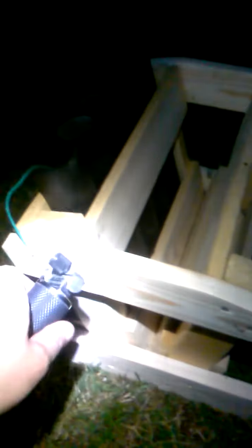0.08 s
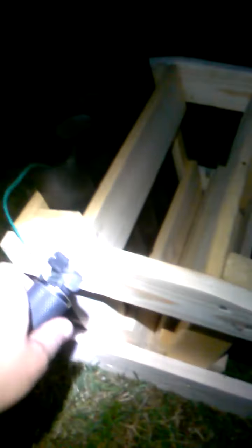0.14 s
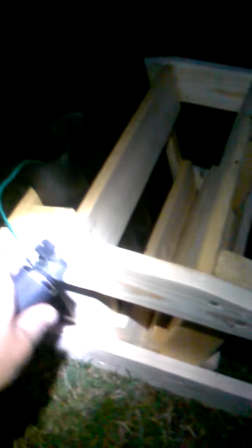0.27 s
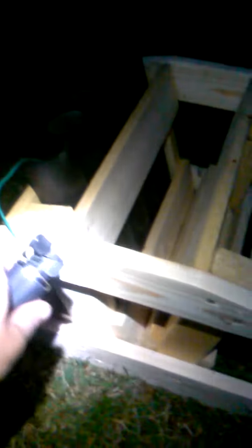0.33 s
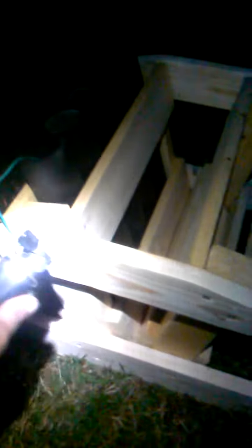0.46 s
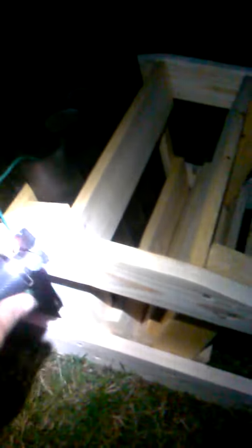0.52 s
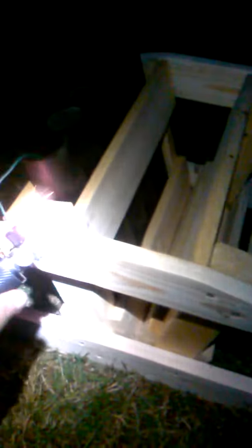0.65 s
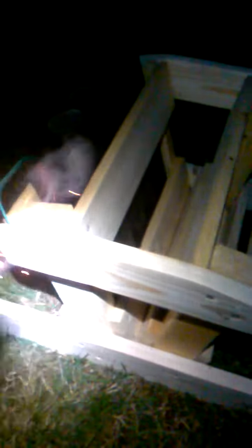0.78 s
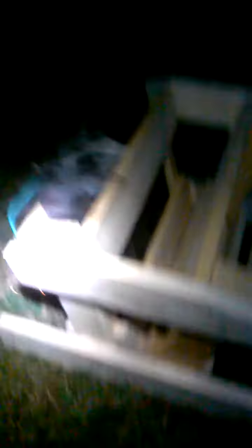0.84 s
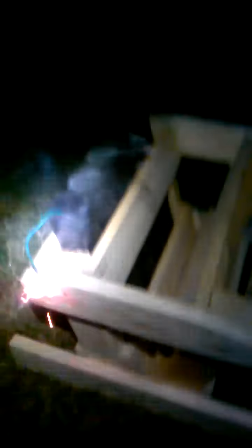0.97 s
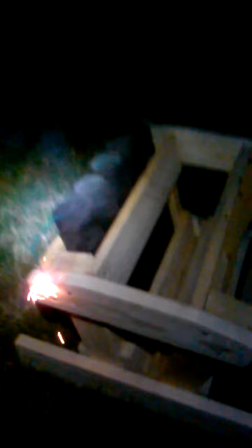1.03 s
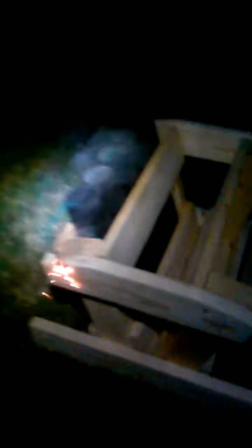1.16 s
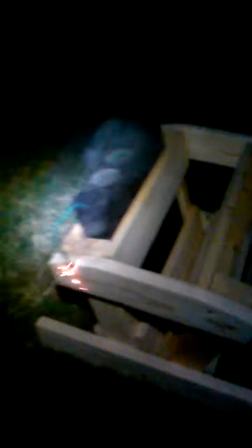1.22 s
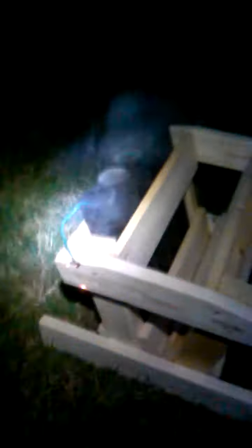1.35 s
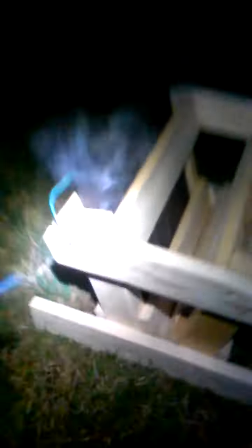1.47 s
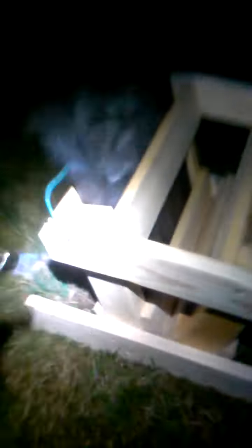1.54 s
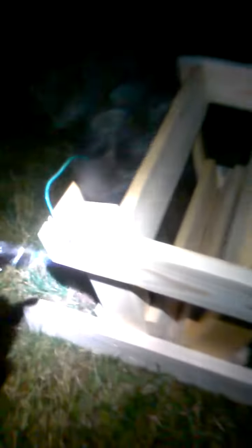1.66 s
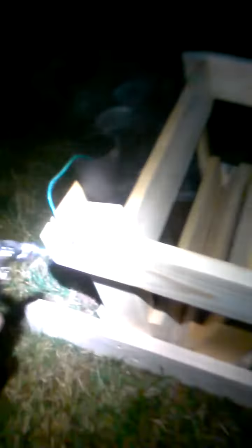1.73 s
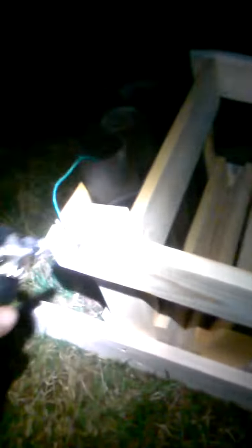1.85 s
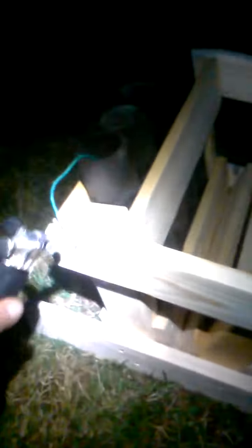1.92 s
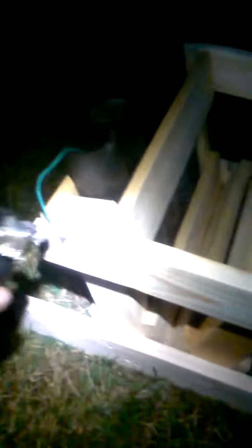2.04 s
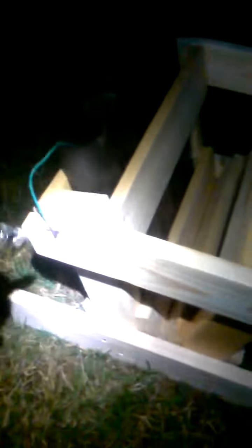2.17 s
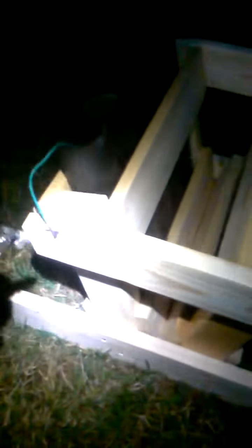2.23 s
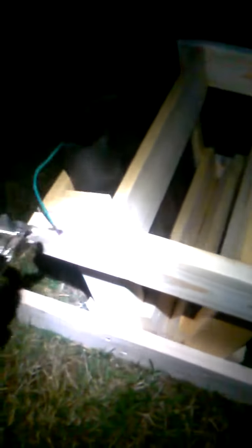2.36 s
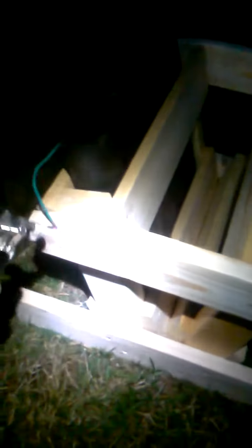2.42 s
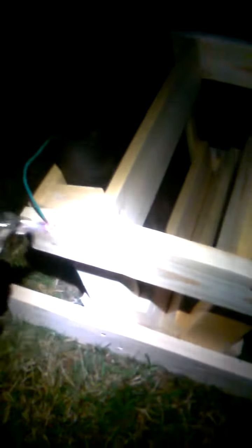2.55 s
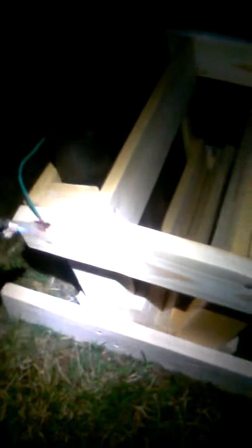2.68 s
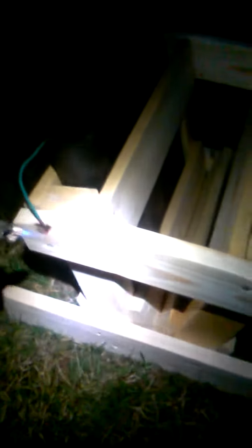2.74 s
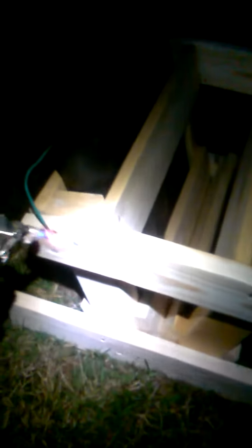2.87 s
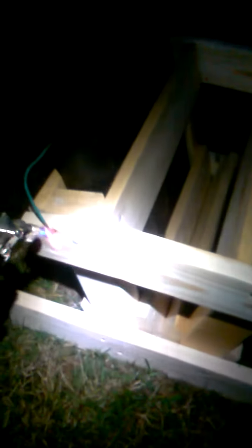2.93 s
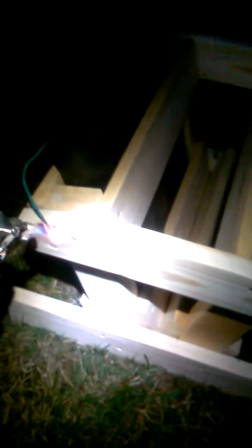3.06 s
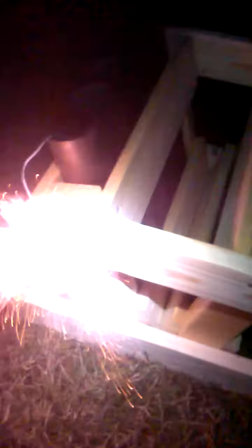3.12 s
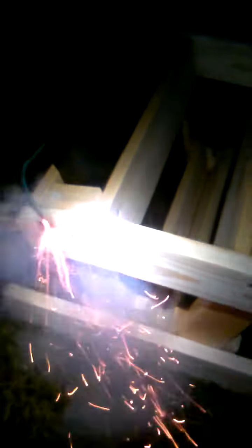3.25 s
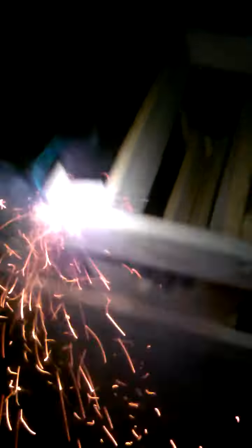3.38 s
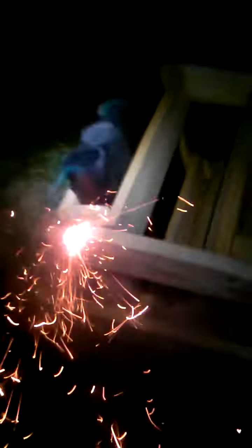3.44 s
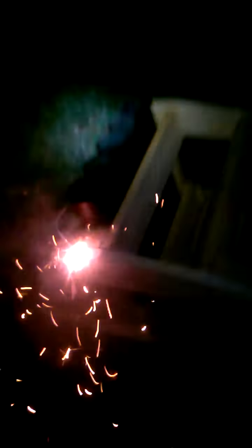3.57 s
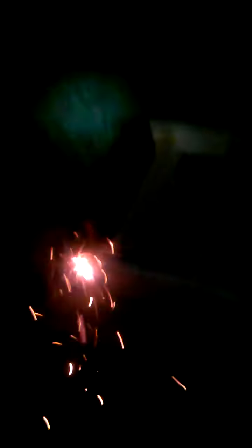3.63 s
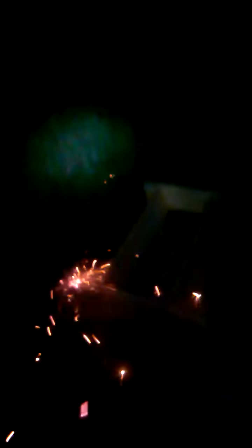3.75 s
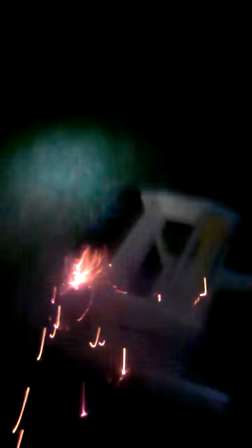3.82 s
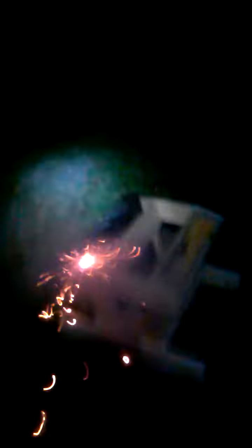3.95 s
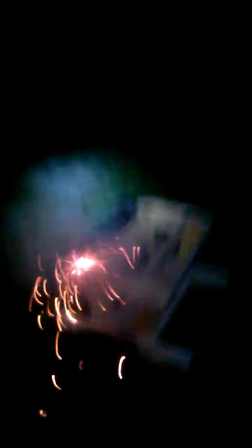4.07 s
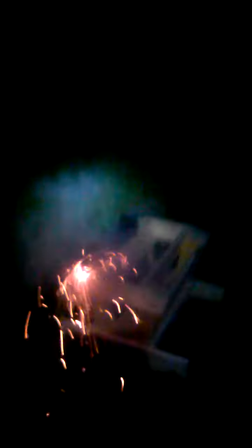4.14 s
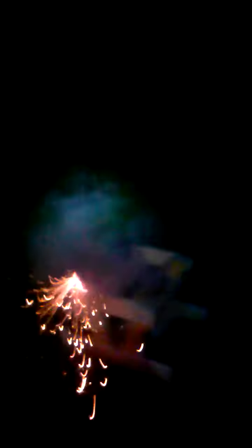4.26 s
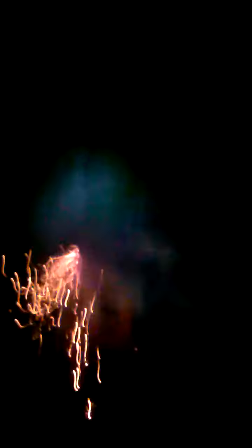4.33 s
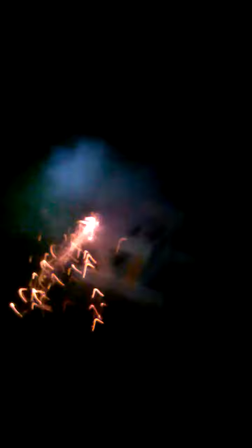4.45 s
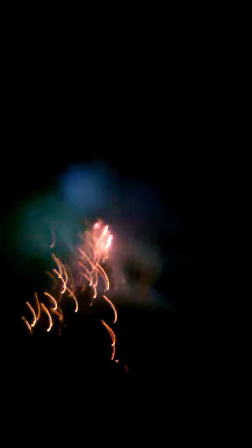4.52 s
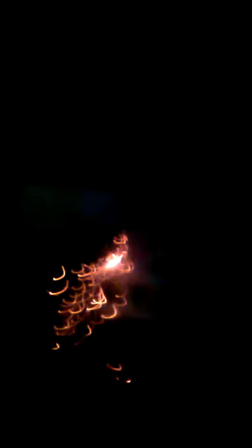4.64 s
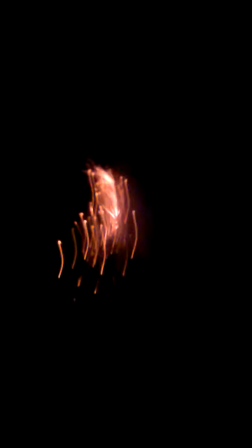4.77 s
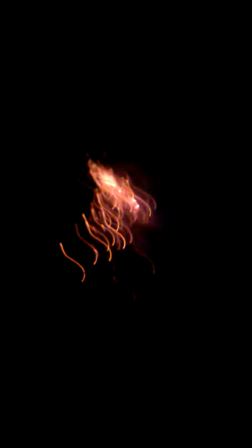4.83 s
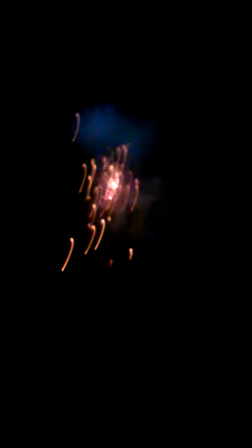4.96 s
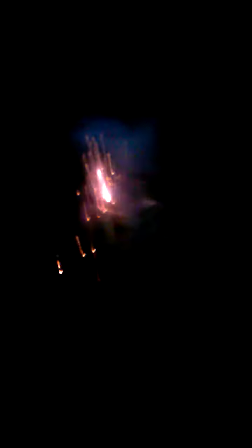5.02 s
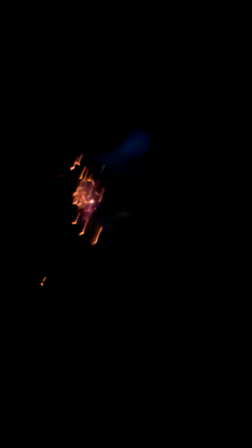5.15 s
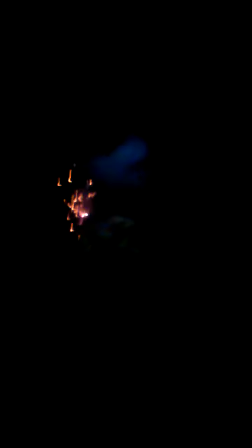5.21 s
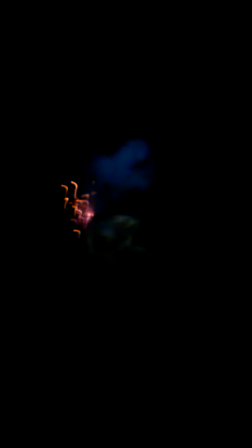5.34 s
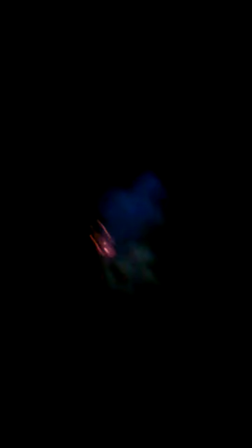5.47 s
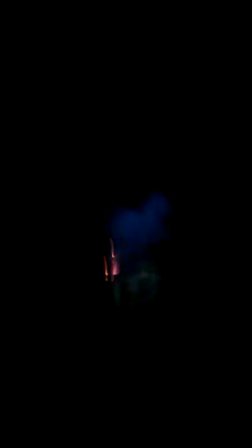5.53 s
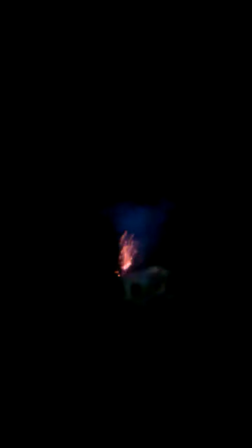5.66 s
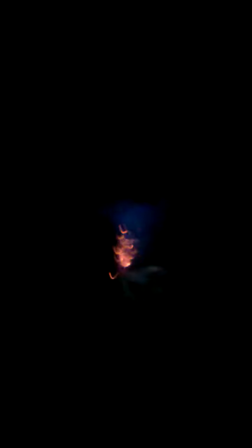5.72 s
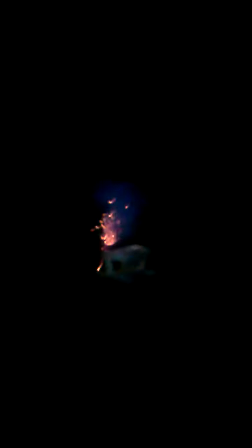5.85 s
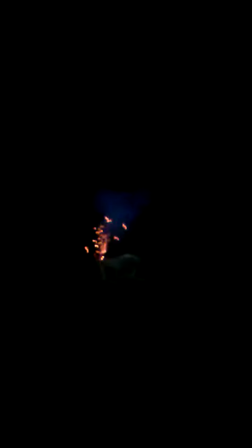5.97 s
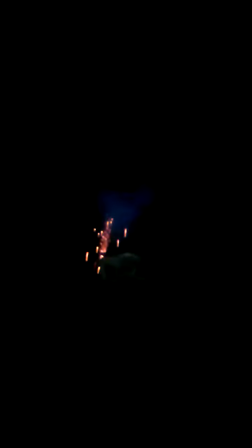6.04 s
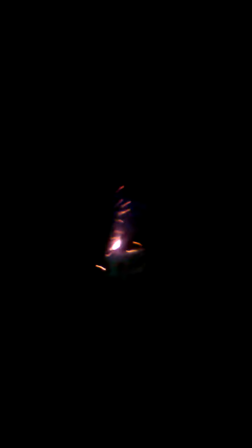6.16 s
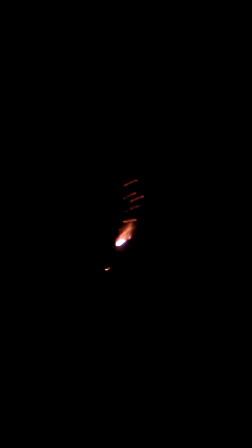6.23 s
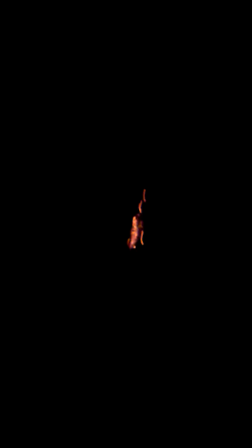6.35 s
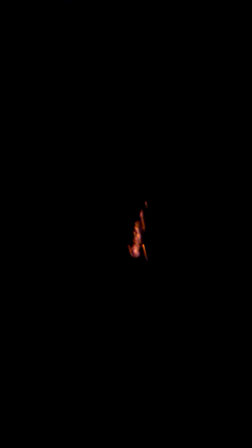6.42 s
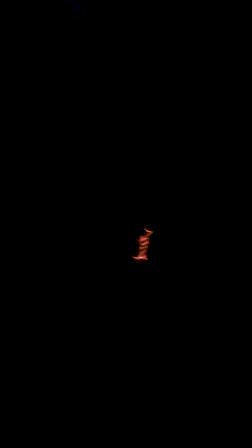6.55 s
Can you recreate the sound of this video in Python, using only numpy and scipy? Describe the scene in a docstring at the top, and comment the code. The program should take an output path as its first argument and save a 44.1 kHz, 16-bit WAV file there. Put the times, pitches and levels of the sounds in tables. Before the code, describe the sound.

A jet lighter hisses, a firework fuse spits briefly, then flares with a fierce whoosh and crackles away as someone retreats over grass at night.

```python
"""A firework fuse, outdoors at night, spits, flares up and burns: filtered noise and random grains in surges.
The jet lighter that lights it is noise through nozzle resonances; sparks snap as damped rings and cracks.
The listener backs away over grass: the fire turns hollow and fades, air buffets the microphone as low noise,
puffs and steps thud as short low pulses, dull knocks are noise bursts, small metal clinks as decaying modes."""
import sys
import numpy as np
from scipy import signal
from scipy.fft import rfft, irfft
from scipy.io import wavfile
from scipy.ndimage import uniform_filter1d, map_coordinates

SR = 44100
rng = np.random.default_rng(int(sys.argv[2]) if len(sys.argv) > 2 else 0)


def to_wav(s):
    """Save 16-bit WAV."""
    ch = np.atleast_2d(s).T  # columns
    pcm = np.round(np.clip(ch, -1, 1) * 32767)  # PCM
    wavfile.write(sys.argv[1], SR, pcm.astype(np.int16))


N = 290751
TIME = np.arange(N) / SR
FREQS = np.fft.rfftfreq(N, 1 / SR)
# Stages of the fuse, of the walk and of the stray sparks: start and end in seconds.
SPIT_S, FLARE_S, BURN_S = (.82, 1.87), (3.17, 3.69), (3.69, 6.6)
WALK_S, STRAY_S = (3.25, 6.25), (4.65, 6.59)


def amp(db):
    """Decibels to gain."""
    return 10 ** (np.asarray(db) / 20)


def unit(x):
    """Scales to rms 1."""
    return x / np.sqrt(np.mean(x ** 2) + 1e-20)


def decay(t, t60_s):
    """Exponential decay by 60 dB in t60_s."""
    return np.exp(-np.log(1000) * t / t60_s)


def colour(points):
    """Gain of a spectrum drawn in dB on a log-frequency axis."""
    hz, db = np.transpose(points)
    return amp(np.interp(np.log(FREQS + 1), np.log(hz + 1), db))


def curves(rows):
    """Each column of a table as a curve in time."""
    s, *columns = np.transpose(rows)
    return [np.interp(TIME, s, column) for column in columns]


def within(span_s, fade_s):
    """One from the start to the end of a span, fading to zero outside it."""
    ramp = np.minimum(TIME - span_s[0], span_s[1] - TIME) / fade_s + 1
    return np.clip(ramp, 0, 1) ** 2


def during(rows, fade_s):
    """One over the span of a table, fading to zero outside it."""
    return within((rows[0][0], rows[-1][0]), fade_s)


def shaped(x, gain):
    """Filters by a gain per frequency."""
    return irfft(rfft(x) * gain, N)


def halves(x, split_hz, low_band_hz, high_band_hz):
    """Splits a sound in two parts, each scaled to rms 1 within its own band."""
    share = 1 / (1 + (FREQS / split_hz) ** 8)
    parts = []
    for gain, (lo, hi) in ((share, low_band_hz), (1 - share, high_band_hz)):
        part = shaped(x, gain)
        in_band = shaped(x, (FREQS > lo) & (FREQS < hi))
        parts.append(part / np.std(in_band))
    return parts


def waver(corner_hz):
    """Random motion of rms 1, low-passed with a Gaussian."""
    return unit(shaped(rng.standard_normal(N), np.exp(-(FREQS / corner_hz) ** 2)))


def add(mix, s, sound):
    """Mixes a sound in at a time."""
    part = mix[round(s * SR):][:len(sound)]
    part += sound[:len(part)]


def gusts(rows, attack_s, fall_db_per_s, span_s=(0, np.inf)):
    """Gusts starting within a span rise, hold and die away; gives the gain of their low and high part."""
    power = np.zeros((2, N))
    t = np.arange(SR) / SR
    for s, length_s, *levels_db in rows:
        if span_s[0] <= s < span_s[1]:
            shape = np.minimum(t / attack_s, 1) * amp(-fall_db_per_s * np.maximum(t - length_s, 0))
            for part, db in zip(power, levels_db):
                add(part, s, (amp(db) * shape) ** 2)
    return np.sqrt(power)


def resonate(x, hz, width_hz):
    """Two passes of a resonance that follows the curve hz; width_hz is that of one pass."""
    turn = np.exp(2j * np.pi * np.cumsum(hz) / SR)
    r = np.exp(-np.pi * width_hz / SR)
    for _ in range(2):
        x = turn * signal.lfilter([1 - r], [1, -r], x / turn)
    return unit(x.real)


def airy_tone(rows, width_hz):
    """Noise sounds one narrow resonance that slides in pitch."""
    hz, db = curves(rows)
    return during(rows, fade_s=0.046) * amp(db) * resonate(rng.standard_normal(N), hz, width_hz)


# Still air. Each point: frequency in Hz, relative gain in dB.
NIGHT_COLOUR = [(12, -35), (20, 3.5), (48, 4), (107, 0), (258, -7.5), (400, -7.5), (520, -13.5),
                (880, -120)]


def night_air(level_db=-51.5):
    """Still night air: steady low noise."""
    return amp(level_db) * unit(shaped(rng.standard_normal(N), colour(NIGHT_COLOUR)))


# Lighter jet, one list per try. Each row: time in seconds, roar and nozzle whistle in relative dB.
JET_LEVELS = [
    [(0, -43, -51.5), (.3, -41, -54.5), (.6, -42.5, -53), (.84, -44, -53.5)],
    [(1.6, -47.5, -49), (1.8, -40, -50), (1.87, -45.5, -52), (1.93, -38.5, -47), (2.3, -37.5, -46.5),
     (2.56, -36.5, -47), (2.9, -38.5, -46.5), (3.16, -36.5, -47)],
]
# Jet resonances per try. Each row: frequency in Hz, nominal width in Hz, relative level in dB.
FIRST_TRY_MODES = [(200, 390, -29), (620, 265, -1), (1275, 540, -10), (1960, 190, -13.5), (3160, 700, -11),
                   (5050, 540, -11), (7630, 2100, -11.5), (10030, 1700, -8.5), (12750, 1200, -8.5),
                   (15500, 2500, -23)]
SECOND_TRY_MODES = [(200, 500, -30), (539, 250, 9), (1190, 440, -7.5), (1920, 240, -21), (3165, 350, -11.5),
                    (5200, 980, -22), (7710, 930, -8.5), (10360, 1200, -16.5), (13060, 1300, -13)]
# Jet cancels against its echo from the wood. Each row: centre in Hz, 1/e half-width in Hz, gain in dB.
JET_DIPS = [(2500, 230, -5), (3700, 310, -8.5)]


def jet(rows, modes, fade_s, roar_db, whistle_db, skirt):
    """Turbulent gas sounds the resonances of the lighter's nozzle."""
    power, dips_db = 0, 0
    for hz, width_hz, db in modes:
        power = power + amp(db) ** 2 / (1 + ((FREQS - hz) / (0.43 * width_hz)) ** 2) ** skirt
    for hz, width_hz, db in JET_DIPS:
        dips_db = dips_db + db * np.exp(-((FREQS - hz) / width_hz) ** 2)
    gas = shaped(rng.standard_normal(N), np.sqrt(power) * amp(dips_db))
    roar, whistle = halves(gas, 2500, (300, 900), (6500, 15000))
    low_db, high_db = curves(rows)
    sound = amp(low_db + roar_db) * roar + amp(high_db + whistle_db) * whistle
    return during(rows, fade_s) * sound


def powder(grains_per_s, spread_db, grain_db, sputter_db):
    """Burning powder: a sputtering rush of gas with countless tiny bursts of uneven size."""
    sizes = amp(spread_db * np.minimum(rng.exponential(1, N), 4)) * rng.choice([-1, 1], N)
    bursts = sizes * (rng.random(N) < grains_per_s / SR)
    gas = rng.standard_normal(N)
    return (gas + amp(grain_db) * unit(bursts)) * amp(sputter_db * waver(corner_hz=140))


def reflections(x, strength, nearest_s, farthest_s, drift, count=6):
    """Echoes from the boards and the ground comb the hiss; the combs slide as their delays sway."""
    out = x.copy()
    for k, lag_s in enumerate(np.geomspace(nearest_s, farthest_s, count)):
        sway = np.sin(2 * np.pi * (rng.uniform(.2, .6) * TIME + rng.random()))
        position = (TIME - lag_s * (1 + drift * sway)) * SR
        out += (-1) ** k * strength * map_coordinates(x, [position], order=3)
    return out


def flicker(x, patchy_db, size=256):
    """The flame's colour shifts from moment to moment, in patches some hundreds of hertz wide."""
    overlap = size * 3 // 4
    z = signal.stft(x, nperseg=size, noverlap=overlap)[2]
    patches = uniform_filter1d(rng.standard_normal(z.shape), size=5, axis=0)
    patches = uniform_filter1d(patches, size=22, axis=1)
    return signal.istft(z * amp(patchy_db * unit(patches)), nperseg=size, noverlap=overlap)[1][:N]


# Surges of burning powder. Each row: start in seconds, hold in seconds, rush and fizz in relative dB.
SURGES = [(.85, 0.13, -64, -42), (.905, 0.16, -38.5, -47), (.995, 0.013, -35.5, -56),
          (1.185, 0.11, -34.5, -39.5), (1.36, 0.067, -39, -40), (1.45, .06, -46, -49.5),
          (1.66, 0.033, -44, -55), (3.18, 0.03, -17.5, -16), (3.227, 0.072, -24, -18.5),
          (3.348, 0.034, -26, -16), (3.38, 0.018, -24, -13.5), (3.424, 0.011, -25.5, -16.5),
          (3.455, 0.0098, -26.5, -21.5), (3.49, 0.036, -29, -21.5), (3.542, 0.013, -26.5, -22.5),
          (3.641, 0.008, -28, -20), (3.705, 0.098, -34, -27), (3.935, 0.026, -41, -31),
          (4.025, 0.011, -49, -35), (4.09, 0.021, -35.5, -31.5), (4.165, 0.079, -40, -31),
          (4.31, 0.044, -50, -30.5), (4.39, .11, -38.5, -29), (4.705, 0.094, -39, -28.5),
          (4.925, 0.054, -37.5, -26.5), (5.025, 0.018, -53, -28), (5.303, 0.042, -37.5, -35.5),
          (5.452, 0.047, -46, -38), (5.533, 0.01, -41.5, -31), (5.622, 0.11, -41.5, -29.5),
          (5.818, 0.023, -51, -38), (5.9, 0.043, -46, -31), (6.188, 0.021, -39, -28.5),
          (6.28, 0.02, -50, -38), (6.39, .02, -64, -42), (6.463, .125, -44, -33)]


def spit_strength(rush_db=-48, fizz_db=-52):
    """Rush and fizz gain of the spit: soft surges over a smoulder."""
    low, high = gusts(SURGES, attack_s=0.013, fall_db_per_s=129, span_s=SPIT_S)
    smoulder = within(SPIT_S, fade_s=0.089)
    return np.hypot(low, amp(rush_db) * smoulder), np.hypot(high, amp(fizz_db) * smoulder)


# Each point: frequency in Hz, relative gain in dB.
SPIT_COLOUR = [(59, -26.5), (100, -13), (153, -9), (233, -12.5), (265, -17), (342, -4.5), (593, -9),
               (748, -5.5), (1600, -4), (2200, -7.5), (3370, -15), (4530, -8), (8370, -5), (9910, -5.5),
               (15800, -19)]


def spit(rush_db=-2.0):
    """The tip of the fuse catches for a moment and dies."""
    fire = powder(grains_per_s=1200, spread_db=4.5, grain_db=-4.0, sputter_db=1.0)
    fire = shaped(fire, colour(SPIT_COLOUR))
    fire = reflections(fire, strength=0.11, nearest_s=0.00185, farthest_s=.007, drift=0.111)
    rush, fizz = halves(fire, 3000, (900, 2600), (4000, 15000))
    low, high = spit_strength()
    return amp(rush_db) * low * rush + high * fizz


# Hollow puff of the spit. Each row: time in seconds, pitch in Hz, level in dB.
PUFF = [(.82, 560, -46), (.92, 536, -37), (1.0, 554, -35.5), (1.08, 474, -51), (1.14, 450, -39.5),
        (1.3, 490, -45), (1.47, 477, -42.5), (1.6, 490, -50)]


def puff():
    """The spit's gas sounds a hollow, sliding resonance."""
    return airy_tone(PUFF, width_hz=163)


# Snaps, loud and faint, of sparks or things knocking in the hand.
# Each row: start in seconds, relative level in dB, pitch in Hz, noisiness from 0 to 1.
SNAPS = [(1.054, -26, 11800, 0), (1.148, -7.5, 7300, 0.92), (1.152, -8.5, 9100, 0.5),
         (1.1555, -6, 5880, .9), (1.185, -15, 8900, .7), (1.2079, -18.5, 6850, 0.56),
         (1.319, -21.5, 8200, 0.93), (1.371, -11.5, 7840, 0.34), (1.3774, -13, 7700, 0.1),
         (1.3883, -15.5, 7700, 0.3), (1.392, -13.5, 8600, 0.05), (1.832, -19.5, 7000, 0.1),
         (3.437, -13, 6700, .8), (4.4621, -9, 7460, 0.7), (4.4654, -7, 11400, 0.65), (4.477, -6, 9200, 0.1),
         (4.4812, -7, 8600, .85), (4.713, -13, 10500, 0.6), (4.744, -4, 11800, 0.3), (4.757, -4, 6100, 0.7),
         (4.7668, 0, 6100, 0.7), (4.777, -0.5, 7040, 0.6), (4.7826, 4, 6050, 0.86), (4.89, -13, 5900, .3),
         (4.898, -8, 6400, .9), (4.946, -17, 5600, 0.6), (4.958, -6, 6940, 0.75),
         (4.9682, -4.5, 9100, 0.97), (4.976, -6, 7800, 0.5), (5.315, -13.5, 6760, 0.04),
         (5.3382, -6.5, 6570, 0.47), (5.3404, -11.5, 4860, 0.36), (5.45, -19, 5860, 0.1),
         (5.5374, -22, 7800, 0.5), (5.6403, -5, 6000, 0.77), (5.662, -12, 6100, 0.2),
         (5.6995, -3, 7600, 0.5), (5.7028, -3, 8800, 1), (5.7407, -5.5, 6260, 1),
         (5.9115, -16.5, 5100, 0.6), (5.9438, -20, 6000, .6), (6.0467, -11.5, 7330, 0),
         (6.192, -21, 7200, 0.05), (6.207, -12.5, 7200, 0.5), (6.2491, -15, 10800, .6),
         (6.4684, -15.5, 11700, 0.5), (6.519, -12, 10000, .95), (6.5287, -4.5, 7600, 0.34),
         (6.561, -10, 6500, .7), (6.5676, -5, 6600, 0.34)]
SCATTER_MEAN_GAP_S, SCATTER_DROP_DB = .0055, 12.5
STRAY_PER_S, STRAY_OVER_FIZZ_DB, STRAY_SPREAD_DB = 22, 13.5, 1
STRAY_HZ, DETUNE_OCTAVES, STRAY_NOISINESS = 6530, 0.22, 0.35


def sparks(scatter_count=2, slots=200):
    """Typed snaps, the weaker ones they scatter, and strays at jittered times that follow the fizz level."""
    rows = list(SNAPS)
    for (s, db, hz, noisy), draws in zip(SNAPS, rng.random((len(SNAPS), scatter_count, 2))):
        for gap, tune in draws:
            s += SCATTER_MEAN_GAP_S * (.5 + gap)
            db -= SCATTER_DROP_DB
            rows.append((s, db, hz * 2 ** (DETUNE_OCTAVES * (2 * tune - 1)), noisy))
    fizz = burn_strength()[1]
    times = STRAY_S[0] + (np.arange(slots) + rng.random(slots)) / STRAY_PER_S
    for s, (loud, tune) in zip(times[times < STRAY_S[1]], rng.standard_normal((slots, 2))):
        fizz_db = 20 * np.log10(np.interp(s, TIME, fizz) + 1e-9)
        db = fizz_db + STRAY_OVER_FIZZ_DB + STRAY_SPREAD_DB * loud
        rows.append((s, db, STRAY_HZ * 2 ** (DETUNE_OCTAVES * tune), STRAY_NOISINESS))
    return rows


# Each point: frequency in Hz, relative gain in dB.
SNAP_COLOUR = [(1000, -19.5), (2500, -5), (3800, -5.5), (5000, 5.5), (8000, 0), (11000, 0), (15800, -8)]


def snaps(level_db=3, ring_t60_s=0.0073, rise_s=0.00027, tail_db=-19, tail_t60_s=0.057, overtone=0.51, echo=0.15):
    """Each snap is a brief damped ring and a noisy crack, with a noise tail and a ground echo."""
    out, t = np.zeros(N), np.arange(2048) / SR
    for s, db, hz, noisy in sparks():
        crack, scatter = rng.standard_normal((2, len(t)))
        upper_hz = hz * rng.uniform(1.026, 1.36)
        tone = unit(np.sin(2 * np.pi * hz * t) - overtone * np.sin(2 * np.pi * upper_hz * t))
        hit = (np.sqrt(1 - noisy) * tone + np.sqrt(noisy) * crack) * decay(t, ring_t60_s)
        hit += amp(tail_db) * scatter * decay(t, tail_t60_s)
        hit *= amp(db + level_db) * (1 - np.exp(-t / rise_s))
        add(out, s, hit)
        add(out, s + rng.uniform(0.003731, 0.004018), echo * hit)
    return shaped(out, colour(SNAP_COLOUR))


# Low soft thuds: puffs of the spitting fuse, then steps on grass.
# Each row: start in seconds, level in dB, pitch in Hz.
THUDS = [(1.056, -33, 70), (1.264, -45, 92), (1.716, -39, 51), (4.811, -19, 101), (5.125, -16, 50),
         (5.157, -15, 74), (5.616, -15.5, 59), (5.639, -11, 118), (6.062, -8, 70.5)]


def thuds(cycles=0.4):
    """A thud is a soft push, strongest after a fraction of a cycle, that dies within a cycle or two."""
    out, t = np.zeros(N), np.arange(SR // 5) / SR
    for s, db, hz in THUDS:
        u = t * hz / cycles
        add(out, s, amp(db) * u * np.exp(1 - u) * np.sin(2 * np.pi * hz * t))
    return out


# Jet whistles briefly as it is aimed anew. Each row: time in seconds, pitch in Hz, level in dB.
WHISTLE = [(2.58, 2720, -63), (2.66, 2770, -54), (2.78, 2870, -61), (2.92, 3000, -63)]


def aiming_whistle():
    """The jet's gas sounds a narrow, rising resonance."""
    return airy_tone(WHISTLE, width_hz=160)


# Swings of the microphone. Each row: start in seconds, hold in seconds, depth and flutter in relative dB.
BUFFET = [(3.18, 0.084, -42, -24.5), (3.36, .11, -44, -34), (3.925, 0.031, -25.5, -36),
          (4.015, 0.048, -28.5, -52), (4.295, 0.12, -24, -33.5), (4.51, .12, -30, -44),
          (5.02, 0.028, -24, -38), (5.115, 0.11, -15.5, -23), (5.36, 0.035, -22, -58),
          (5.45, 0.11, -35, -43), (5.6, 0.048, -20, -29.5), (5.68, 0.13, -30.5, -39.5),
          (5.805, 0.11, -18, -31.5), (5.96, 0.17, -22, -32.5), (6.12, 0.14, -27, -67),
          (6.38, 0.055, -30.5, -56), (6.54, 0.056, -30.5, -48.5)]
# Each point: frequency in Hz, relative gain in dB.
BUFFET_COLOUR = [(8.8, -16), (15, 11), (35, 3.5), (122, -7.5), (176, -14.5), (233, -17.5), (282, -29),
                 (317, -26), (500, -41), (650, -64), (1100, -120)]


def buffet(flutter_db=-1, draught_depth_db=-40, draught_flutter_db=-44):
    """Air tumbles over the moving microphone: a light draught, and a gust with each swing."""
    air = shaped(rng.standard_normal(N), colour(BUFFET_COLOUR))
    depth, flutter = halves(air, 90, (20, 90), (90, 250))
    low, high = gusts(BUFFET, attack_s=0.029, fall_db_per_s=220)
    moving = within(WALK_S, fade_s=0.15)
    low = np.hypot(low, amp(draught_depth_db) * moving)
    high = np.hypot(high, amp(draught_flutter_db) * moving)
    return low * depth + amp(flutter_db) * high * flutter


# Each point: frequency in Hz, relative gain in dB.
FLARE_COLOUR = [(40, 6), (120, -1.5), (300, -8.5), (630, 1), (900, -4), (1250, 1), (2200, -2), (3400, -11),
                (4950, 2.5), (6600, -9), (7700, 3), (10800, -16.5), (13000, -8.5), (15800, -20)]


def flare(fizz_db=-1.0, roar_db=-28, hiss_db=-23, fade_db_per_s=30):
    """The fuse takes fire: a few fierce gusts over a dying roar."""
    fire = powder(grains_per_s=2900, spread_db=1.5, grain_db=-11.0, sputter_db=2.0)
    fire = shaped(fire, colour(FLARE_COLOUR))
    rush, fizz = halves(fire, 3200, (300, 2600), (4000, 15000))
    low, high = gusts(SURGES, attack_s=0.012, fall_db_per_s=333, span_s=FLARE_S)
    age_s = np.maximum(TIME - FLARE_S[0], 0)
    roar = np.minimum(age_s / 0.021, 1) * amp(-fade_db_per_s * age_s) * within(FLARE_S, fade_s=0.054)
    low = np.hypot(low, amp(roar_db) * roar)
    high = np.hypot(high, amp(hiss_db) * roar)
    return low * rush + amp(fizz_db) * high * fizz


# Hollow whoosh of ignition. Each row: time in seconds, pitch in Hz, level in dB.
WHOOSH = [(3.18, 705, -35), (3.205, 610, -23), (3.24, 620, -17), (3.3, 634, -39), (3.45, 630, -31)]


def whoosh():
    """Ignition sounds a hollow, sliding resonance."""
    return airy_tone(WHOOSH, width_hz=120)


# Steady flame between surges. Each row: time in seconds, rush, fizz and sizzle in relative dB.
BURN_LEVELS = [(3.6, -51, -41, -46), (3.7, -37, -38, -40), (3.85, -32.5, -28.5, -38), (4.12, -37, -36, -35),
               (4.5, -36.5, -32.5, -34.5), (4.65, -40, -27.5, -35), (4.88, -34.5, -32.5, -38),
               (5.13, -46, -35.5, -40.5), (5.27, -44, -42.5, -61), (5.38, -42, -47, -59),
               (5.57, -49.5, -42, -48), (5.78, -39.5, -34.5, -40.5), (6.03, -45, -38.5, -55),
               (6.16, -45, -48.5, -66), (6.28, -40.5, -42, -50), (6.59, -62, -44, -56)]


def burn_strength(rush_db=-1, fizz_db=-2, sputter_corner_hz=23.9, sputter_rms_db=1.6):
    """Rush, fizz and sizzle gain: surges over a sputtering flame; the sizzle keeps step with the fizz."""
    low, high = gusts(SURGES, attack_s=0.01, fall_db_per_s=334, span_s=BURN_S)
    rush, fizz, sizzle = curves(BURN_LEVELS)
    alight = during(BURN_LEVELS, fade_s=0.12) * amp(sputter_rms_db * waver(sputter_corner_hz))
    low = np.hypot(low, amp(rush + rush_db) * alight)
    high = np.hypot(high, amp(fizz + fizz_db) * alight)
    return low, high, high * amp(sizzle - fizz)


# Backing away. Each row: time in seconds, remoteness from 0 to 1, lower and upper hollow resonance in Hz.
RETREAT = [(3.7, 0, 1050, 2200), (5.0, 0.14, 1220, 2330), (5.3, 0.71, 1360, 2600), (5.55, 0.67, 1430, 2580),
           (5.75, 0.8, 1600, 2400), (5.92, 1, 1470, 2450), (6.02, 1, 1470, 3040), (6.25, 0.76, 1570, 2710),
           (6.59, 0.78, 1820, 2880)]
# Fire close by and far off. Each point: frequency in Hz, relative gain in dB.
NEAR_COLOUR = [(150, -13), (250, -1.5), (303, -6), (399, -14.5), (772, 2), (984, -5.5), (1660, 0.5),
               (2220, 1), (3040, -11.5), (4860, -5.5), (6520, -6), (7360, -1), (8460, -10.5),
               (14500, -22.5), (15800, -24)]
FAR_COLOUR = [(200, -3), (500, 1.5), (1000, -1.5), (1500, -7), (2200, 7), (3000, 6), (3900, -16),
              (5500, 2.5), (7500, 0), (9000, -7), (12500, -5.5), (15800, -18)]


def burn(fizz_db=-0.86, sizzle_db=0.5, lower_db=-3, upper_db=-5, plain_share=0.14):
    """Steady burning; from farther off it turns sparse, crackly and hollow."""
    remote, lower_hz, upper_hz = curves(RETREAT)
    near = powder(grains_per_s=800, spread_db=3, grain_db=-4.5, sputter_db=2.0)
    near = unit(shaped(near, colour(NEAR_COLOUR)))
    far = powder(grains_per_s=200, spread_db=-1.0, grain_db=2, sputter_db=3.5)
    far = unit(shaped(far, colour(FAR_COLOUR)))
    fire = np.sqrt(1 - remote) * near + np.sqrt(remote) * far
    fire = reflections(fire, strength=0.12, nearest_s=.002, farthest_s=.009, drift=0.114)
    rush, treble = halves(fire, 3700, (700, 3300), (4000, 15000))
    fizz, sizzle = halves(treble, 9000, (4000, 9000), (9000, 15000))
    gas = rng.standard_normal(N)
    hollow = amp(lower_db) * resonate(gas, lower_hz, width_hz=260)
    hollow += amp(upper_db) * resonate(gas, upper_hz, width_hz=750)
    rush = np.sqrt(1 - remote + remote * plain_share) * rush + np.sqrt(remote) * hollow
    low, high, top = burn_strength()
    return low * rush + amp(fizz_db) * high * fizz + amp(sizzle_db) * top * sizzle


# Faint tone during the retreat. Each row: time in seconds, pitch in Hz, level in dB.
SINKING = [(4.08, 327, -49), (4.14, 310, -45), (4.24, 298, -39.5), (4.31, 269, -42), (4.4, 242, -50),
           (4.45, 220, -56), (4.49, 210, -55)]


def sinking_tone():
    """A faint, hollow resonance of noise sinks in pitch."""
    return airy_tone(SINKING, width_hz=54)


# Dull knocks. Each row: start in seconds, level in dB.
KNOCKS = [(4.4824, -25), (4.767, -31), (4.897, -22.5), (4.958, -27), (5.1029, -20.5), (5.117, -25),
          (5.3382, -28.5), (5.7033, -25)]


def knocks(t60_s=0.041, low_hz=280, high_hz=2000):
    """A knock is a short, woody burst in the middle of the range."""
    out, t = np.zeros(N), np.arange(4096) / SR
    body = signal.butter(2, [low_hz, high_hz], "band", fs=SR, output="sos")
    for s, db in KNOCKS:
        burst = unit(signal.sosfilt(body, rng.standard_normal(len(t))))
        add(out, s, amp(db) * burst * decay(t, t60_s))
    return out


# Clinks of small metal. Each row: start in seconds, level in dB, main pitch in Hz, main ring t60 in seconds.
CLINKS = [(4.5495, -23, 11640, .074), (4.5943, 1.5, 11970, 0.11), (4.677, -13.5, 9400, .05),
          (4.678, -10.5, 12000, 0.093), (4.678, -18, 14300, .1), (5.457, -34, 11950, 0.35),
          (5.459, -36, 13600, .2), (5.479, -28.5, 5950, 0.12), (5.506, -24, 11900, .045),
          (5.606, -25, 12000, 0.042), (5.83, -22, 12200, .034), (5.911, -25, 8300, .06),
          (5.9274, -22.5, 11200, 0.038), (6.285, -31.5, 8840, 0.082), (6.306, -24, 11300, 0.055)]
# Metal modes, rescaled to each clink's pitch and ring.
# Each row: reference frequency in Hz, relative level in dB, reference t60 in seconds.
METAL_MODES = [(4942, -32, .5), (6815, -28, .3), (9964, -36, .25), (11944, 0, .125), (14770, -25, .25)]


def clinks(tick_db=-10, tick_t60_s=0.00052):
    """Small metal pieces, such as keys, knock together; each rings the same modes at its own pitch."""
    out, t = np.zeros(N), np.arange(SR // 2) / SR
    main_hz, _, main_t60_s = max(METAL_MODES, key=lambda mode: mode[1])
    for s, db, hz, ring_s in CLINKS:
        sound = amp(tick_db) * rng.standard_normal(len(t)) * decay(t, tick_t60_s)
        for mode_hz, mode_db, t60_s in METAL_MODES:
            tone = np.sin(2 * np.pi * mode_hz * hz / main_hz * t)
            sound += amp(mode_db) * tone * decay(t, t60_s * ring_s / main_t60_s)
        add(out, s, amp(db) * sound)
    return out


def scene():
    """Lighter, fuse and retreat over the still night air."""
    lighter = jet(JET_LEVELS[0], FIRST_TRY_MODES, fade_s=1.0, roar_db=-4.5, whistle_db=2.5, skirt=1.82)
    lighter += jet(JET_LEVELS[1], SECOND_TRY_MODES, fade_s=0.26, roar_db=-3.0, whistle_db=0.0, skirt=1.5)
    lighter += aiming_whistle()
    fuse = flicker(spit() + flare() + burn(), patchy_db=1.95)
    fuse += snaps() + puff() + whoosh()
    low_thuds = thuds()
    retreat = buffet() + sinking_tone() + knocks() + clinks()
    return (night_air() + lighter + fuse + low_thuds + retreat)[None]


def record(dry, edge_hz=15850):
    """The loudest peaks overload; then the band limit."""
    clipped = np.clip(dry, -1, 1)
    low_pass = signal.firwin(401, edge_hz, window=("kaiser", 8), fs=SR)
    return signal.oaconvolve(clipped, low_pass[None], "same")


dry = scene()
out = record(dry)
to_wav(out)
```